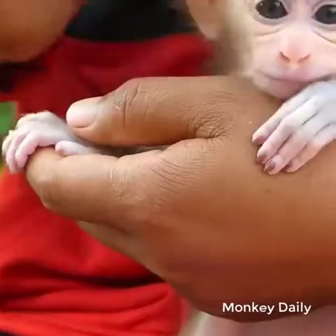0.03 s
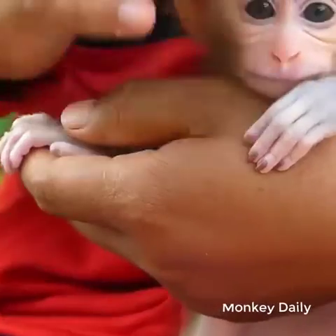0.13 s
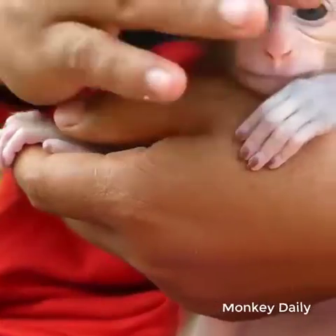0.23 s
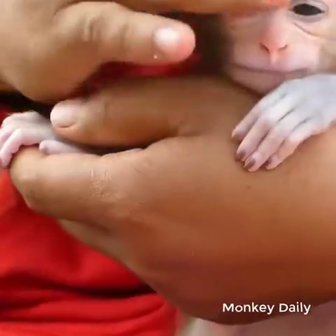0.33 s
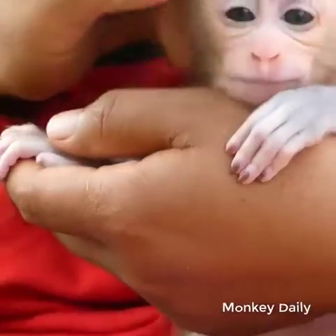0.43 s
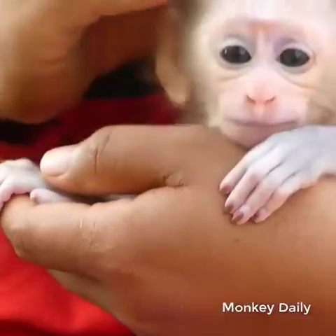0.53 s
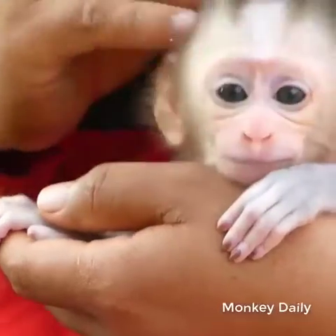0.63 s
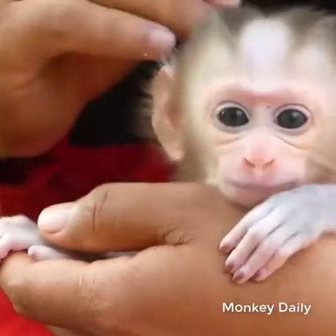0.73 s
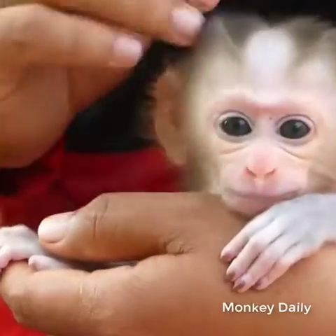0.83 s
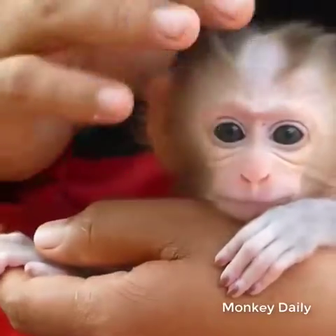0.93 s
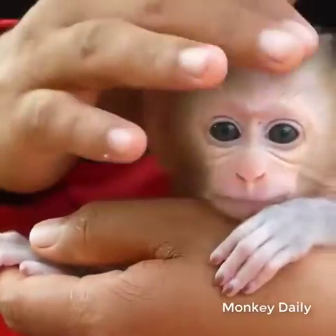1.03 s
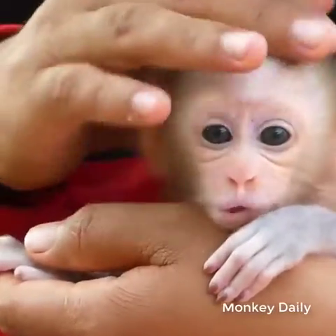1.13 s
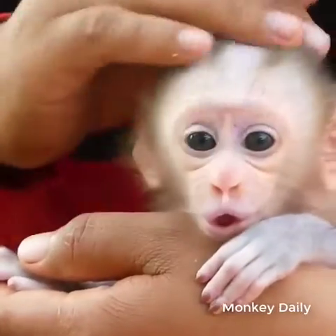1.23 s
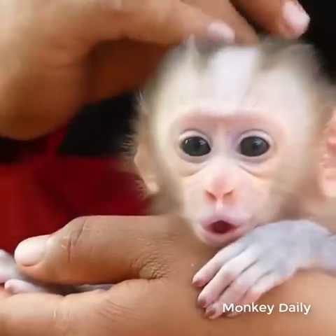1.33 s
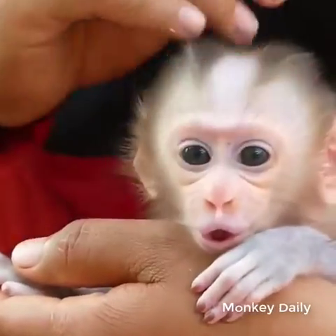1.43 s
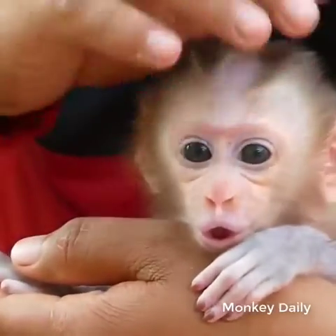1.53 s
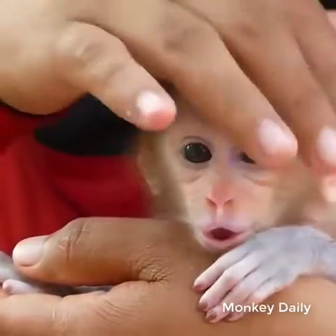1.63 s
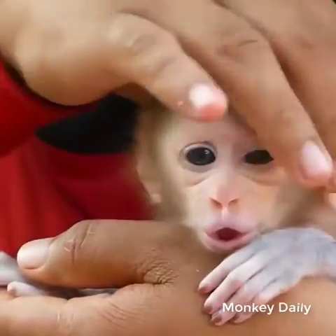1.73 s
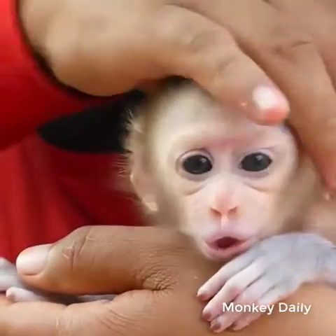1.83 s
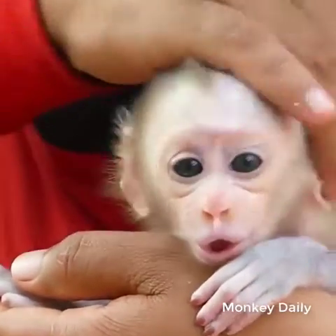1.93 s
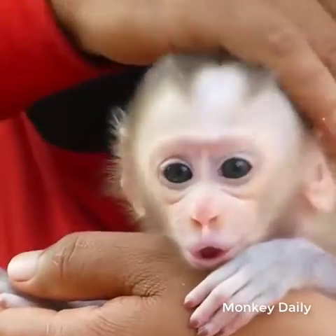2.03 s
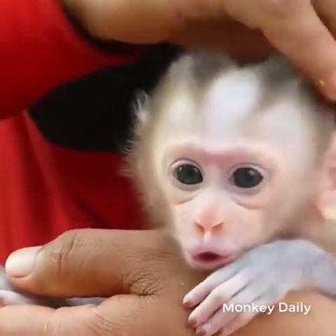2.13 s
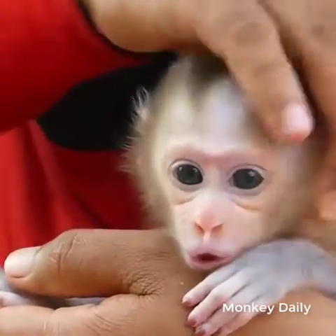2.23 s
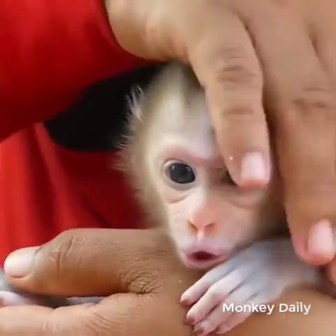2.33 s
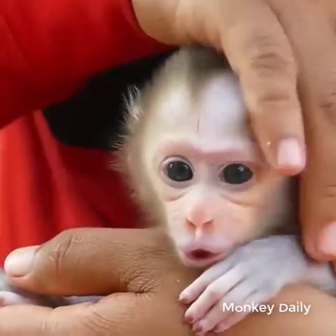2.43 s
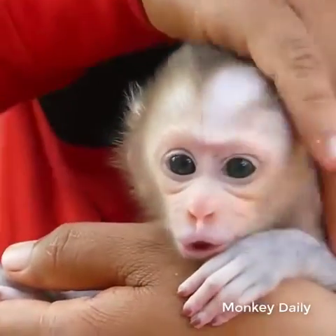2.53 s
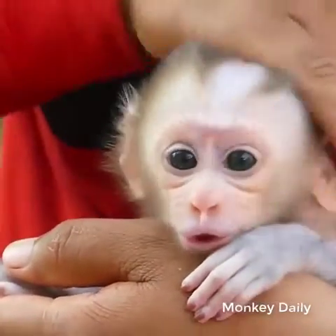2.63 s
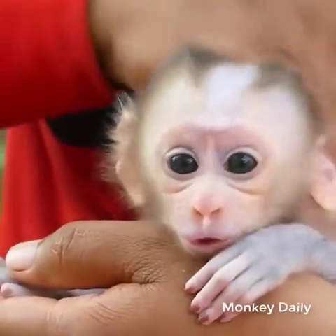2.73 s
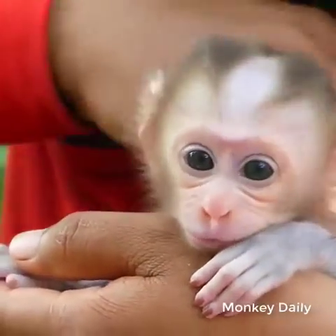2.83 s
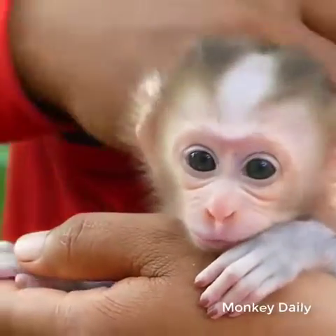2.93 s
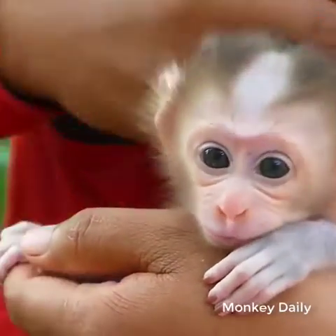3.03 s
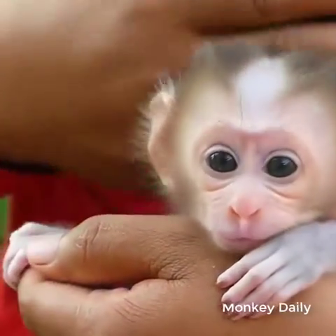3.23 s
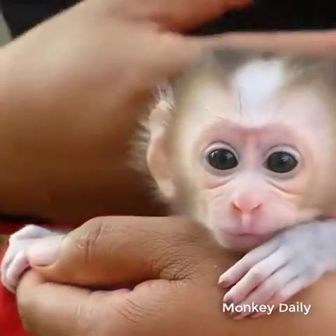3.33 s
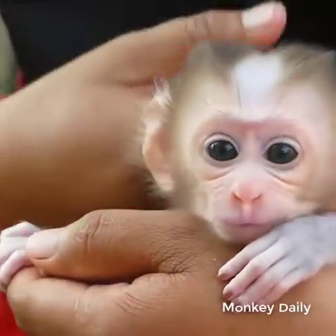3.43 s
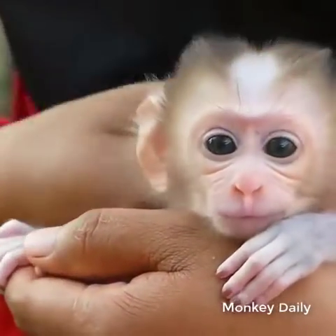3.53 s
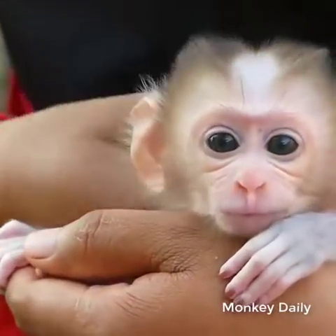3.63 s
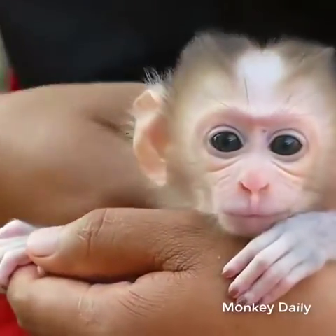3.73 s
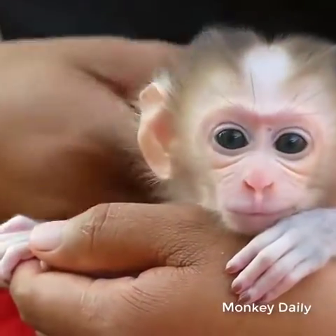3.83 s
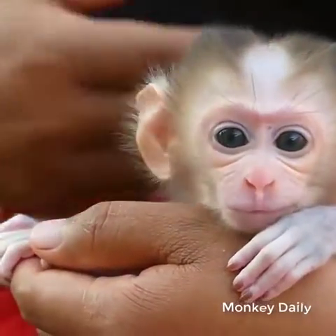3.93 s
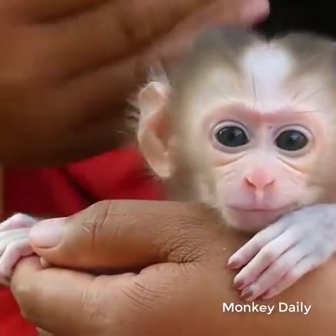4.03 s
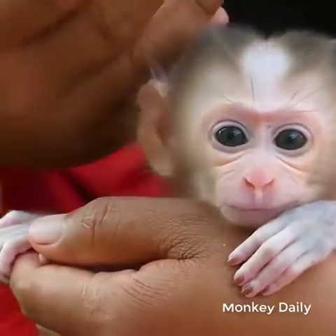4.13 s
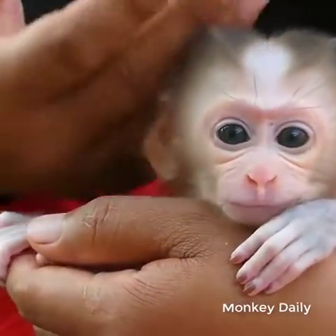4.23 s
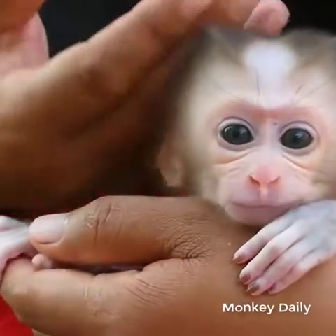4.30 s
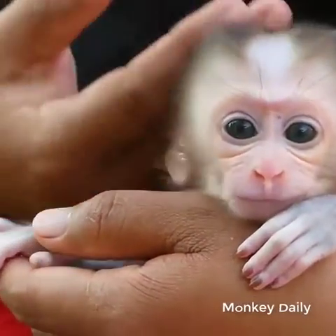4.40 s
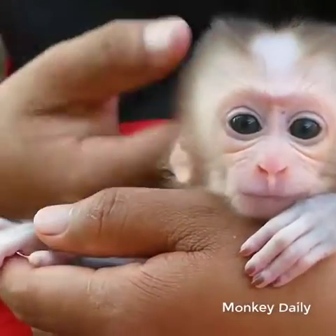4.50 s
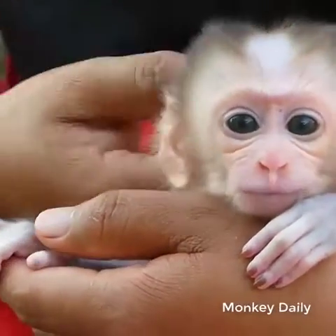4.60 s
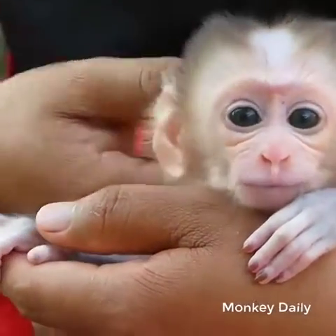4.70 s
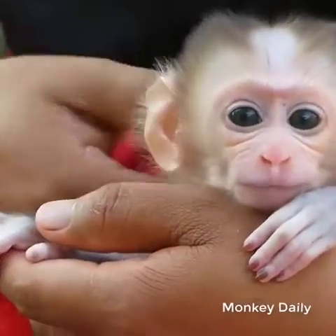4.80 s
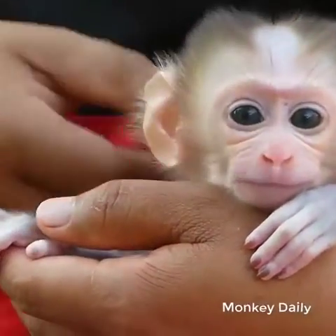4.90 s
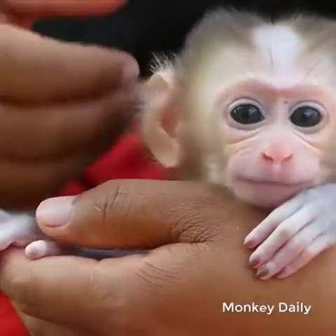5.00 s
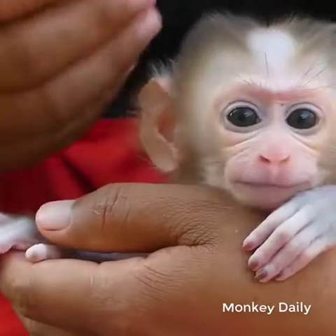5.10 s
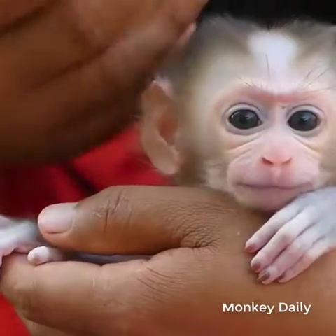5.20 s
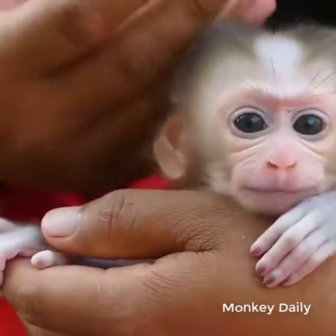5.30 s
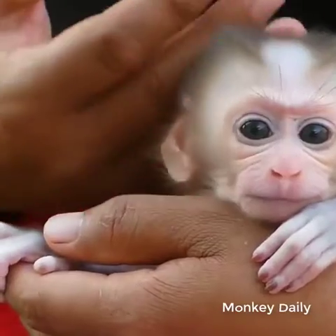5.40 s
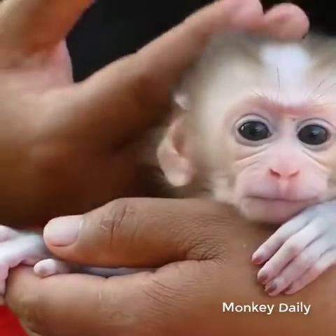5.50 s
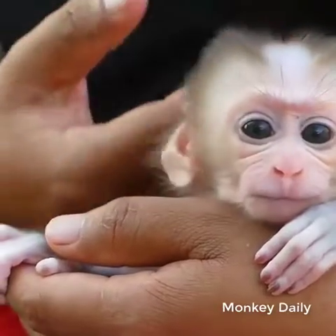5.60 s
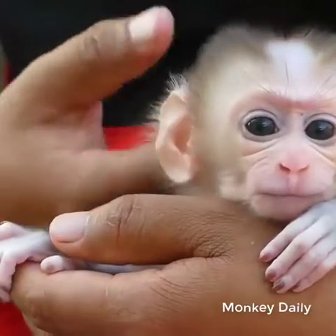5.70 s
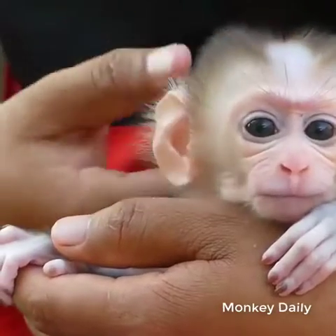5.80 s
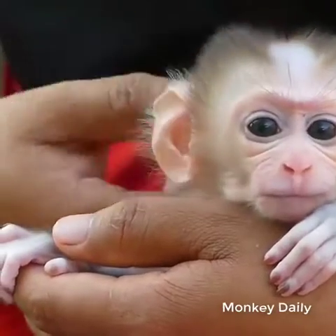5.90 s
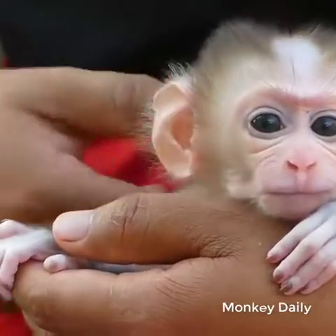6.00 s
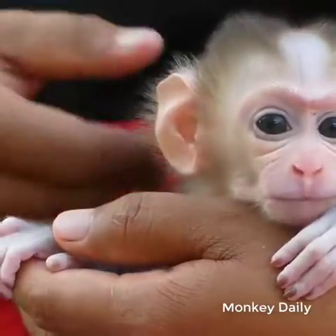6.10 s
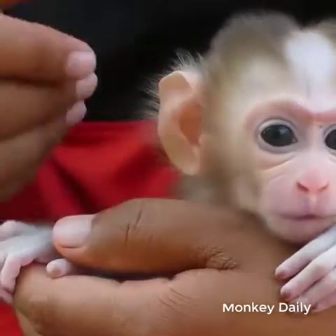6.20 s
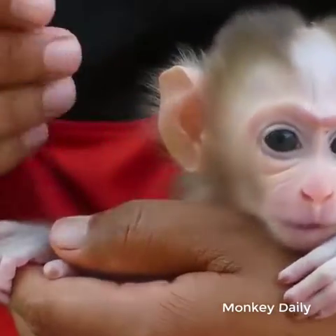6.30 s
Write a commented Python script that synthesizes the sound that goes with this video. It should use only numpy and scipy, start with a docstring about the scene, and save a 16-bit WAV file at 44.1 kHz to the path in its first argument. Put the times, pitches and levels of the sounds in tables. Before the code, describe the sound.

A quiet outdoor yard with reflecting walls: a faint low hum, airy outdoor noise and fine hiss run throughout, while small birds give short, sliding, two-voiced chirps from the start until about 5.8 s. Two very soft brushes of a hand on fur come around 0.6 and 0.9 s. At 1.2 s a baby monkey, close to the microphone, gives a loud, nearly pure coo that rises to a high peak and cracks into a brief rougher tail. Softer arched coos follow at 1.6, 2.0 and 2.4 s, with a tiny wet lip tick at 1.9; the hum swells slightly around 2.3. From 3.2 to 5.4 s faint, reverberant, wavering calls drift from afar. At 5.6, 5.9 and 6.15 s another animal, perhaps a rooster, cries hoarsely: a raspy burst, a clearer throbbing tone, then a longer rasping syllable opening with a squeal, all echoing off the walls.

```python
"""Outdoors, among reflecting walls and ground, a baby monkey close to the microphone gives four arched coos.
Each is a nearly pure gliding tone with overtones let out by the mouth; the voice cracks in the first.
Small birds chirp in two-voiced glides, faint calls drift from afar, and a hand brushes fur as soft noise.
A low hum, outdoor noise and hiss lie under everything. Near the end another animal, perhaps a rooster,
starts a hoarse call in three syllables, part shaky tone and part throat-ringing rasp."""
import sys
import numpy as np
from scipy import signal
from scipy.fft import rfft, irfft
from scipy.io import wavfile
from scipy.ndimage import uniform_filter1d, map_coordinates

SR = 44100
rng = np.random.default_rng(int(sys.argv[2]) if len(sys.argv) > 2 else 0)


def inscribe(sig):
    """Save sig as 16-bit PCM at rate SR to the path in sys.argv[1].

    A 1-D sig is mono; a 2-D sig holds one channel per row.
    Samples are clipped to [-1, 1] before scaling.
    """
    pcm = np.round(np.clip(np.atleast_2d(sig).T, -1, 1) * 32767)
    wavfile.write(sys.argv[1], SR, pcm.astype(np.int16))


N = 280035
TIME = np.arange(N) / SR

# air rushing through the glottis, also colouring the lip smack: (frequency [Hz], relative density [dB/Hz])
RASP_OUTLINE = [(600, -22.5), (1100, -6), (1700, -1.5), (3200, -5.5), (4500, -7.5), (7500, -11.5),
                (8600, -1), (9800, -15), (11000, -12), (15000, -27)]
# hoarse call: (start [s], length [s], attack [s], top pitch [Hz], level, 3 dB above that in the middle [dB],
# clear share in the middle [0-1], squeal length [s], squeal level [dB])
CALL_SYLLABLES = [(5.629, 0.14, 0.037, 763.7, -29.5, 0.1, 0.12, -39),
                  (5.9, 0.14, 0.027, 837, -25.5, 0.79, 0.0086, -35.5),
                  (6.149, 0.4045, 0.074, 795.4, -26.5, 0.23, 0.081, -28)]
REST_HZ = 769  # pitch at which the hoarse throat keeps its resting resonances


def undb(db):
    """Decibels to gain."""
    return 10 ** (np.asarray(db) / 20)


def unit(x):
    """Scale to rms 1."""
    return x / np.sqrt(np.mean(x ** 2))


def shape(hz, points):
    """Gain at hz of a (frequency [Hz], level [dB]) outline."""
    f, db = np.transpose(points)
    return undb(np.interp(np.log(hz + 1), np.log(f), db))


def noise(points):
    """Noise with the given spectral outline, rms 1."""
    spectrum = rfft(rng.standard_normal(N))
    return unit(irfft(spectrum * shape(np.fft.rfftfreq(N, 1 / SR), points), N))


def resonate(x, modes):
    """Pass x through steep parallel resonances (centre [Hz], width [Hz], gain [dB])."""
    f = np.fft.rfftfreq(N, 1 / SR) + 1  # kept off zero
    gain = sum(undb(db) / (1 + ((f * f - hz * hz) / (f * width)) ** 2) for hz, width, db in modes)
    return irfft(rfft(x) * gain, N)


def wobble(rate):
    """Smooth random drift with about `rate` turns a second, rms 1."""
    f = np.fft.rfftfreq(N, 1 / SR)
    return unit(irfft(rfft(rng.standard_normal(N)) * np.exp(-(f / rate) ** 2), N))


def swell(start, length):
    """A smooth rise and fall, 0 to 1 to 0."""
    return np.sin(np.pi * np.clip((TIME - start) / length, 0, 1))


def ramp(age, length):
    """A smooth step from 0 to 1."""
    return np.sin(np.pi / 2 * np.clip(age / length, 0, 1)) ** 2


def glides(table, warble):
    """Sliding tones that swell and fade; long ones warble more than short ones."""
    out = np.zeros(N)
    for start, length, from_hz, to_hz, db in table:
        on = (TIME > start) & (TIME < start + length)
        progress = (TIME[on] - start) / length
        hz = (from_hz + (to_hz - from_hz) * progress) * (1 + length * warble[on])
        phase = 2 * np.pi * np.cumsum(hz) / SR
        out[on] += undb(db) * np.sin(np.pi * progress) * np.sin(phase)
    return out


def yard(x, wet_db, delay_s, t60, width):
    """Direct sound plus scattered reflections from walls and ground; two channels."""
    t = TIME[:SR]
    tail = rng.standard_normal((2, SR)) * undb(-60 * t / t60) * (t > delay_s)
    tail /= np.sqrt(np.sum(tail ** 2, axis=1, keepdims=True))
    mid, side = (undb(wet_db) * signal.fftconvolve(x, h)[:N] for h in tail)
    return np.array([x + mid + width * side, x + mid - width * side])


def background():
    """Narrow bands of noise waver as a low hum under wavering outdoor noise and a hiss differing by side."""
    # noise common to both sides, and noise opposed between them: (frequency [Hz], relative density [dB/Hz])
    mid_outline = [(35, -47), (75, -11.5), (130, 3), (280, -4.5), (520, -5.5), (900, -10), (1700, -16.5),
                   (4500, -17.5), (7100, -18), (7800, -24.5), (9000, -20.5), (10000, -19.5), (10700, -14.5),
                   (15000, -20.5)]
    side_outline = [(30, -39.5), (70, -32.5), (130, -2), (300, 3.5), (550, 2), (1000, -3), (2000, -8),
                    (5000, -25), (7000, -47), (8500, -13.5), (11000, -18.5), (15000, -34.5)]
    # low hum: (centre [Hz], width [Hz], level before the common trim [dB])
    hum_bands = [(109.1, 14, -70), (147.8, 22, -68), (196.6, 8, -75)]
    trim_db, swell_db = -2.5, 7
    hum = np.zeros(N)
    for hz, width, db in hum_bands:
        hum += undb(db) * unit(resonate(rng.standard_normal(N), [(hz, width, 0)]))
    hum *= undb(trim_db + swell_db * swell(1.54, length=1.5))  # the hum swells once
    mid = undb(-56.5) * noise(mid_outline) * undb(2.3 * wobble(1.6))
    side = undb(-59) * noise(side_outline)
    return hum + mid + np.array([side, -side])


def far_calls():
    """Wavering gliding tones from a distance, with strong reverberation."""
    # faint calls: (start [s], length [s], start pitch [Hz], end pitch [Hz], level [dB])
    calls = [(3.23, 0.25, 784.3, 796, -62.5), (3.47, 0.15, 966, 994, -59.5), (3.6, 0.76, 771, 627.5, -63),
             (4.27, 0.24, 1228, 1109, -63), (4.52, 0.27, 985, 763.4, -61.5), (4.9, 0.21, 1001, 1029, -59.5),
             (5.15, 0.21, 500, 495.5, -60)]
    return yard(glides(calls, 0.166 * wobble(60)), wet_db=-3, delay_s=0.0143, t60=0.96, width=0.4)


def birds():
    """The two sides of the syrinx sing warbling glides together, heard with strong reflections."""
    # chirps, lower voice: (middle [s], pitch [Hz], glide [octaves], level [dB])
    chirps = [(0.026, 4060, -0.46, -55), (.225, 3905, -0.94, -56.5), (0.897, 3725, -0.74, -57),
              (1.05, 4070, .5, -55.5), (1.217, 3704, -0.39, -53), (1.86, 3520, -0.37, -52),
              (2.255, 3620, -1, -50), (2.448, 4200, -.4, -51.5), (2.558, 4180, -0.45, -57.5),
              (2.871, 3730, -0.86, -49), (3.128, 3000, 0.74, -52.5), (3.31, 3350, 0.46, -62.5),
              (3.525, 3440, 0.81, -52.5), (3.724, 3450, 0.74, -56), (4.489, 3930, -.5, -52),
              (4.86, 2998, -0.79, -52), (5.078, 3460, -0.61, -50), (5.189, 3973, -.4, -58.5),
              (5.833, 3900, -.4, -49.5)]
    chirp_s = .074
    interval = 1.3  # pitch ratio of the upper voice to the lower
    lower, upper = [], []
    for middle, hz, glide, db in chirps:
        start = middle - chirp_s / 2
        from_hz, to_hz = hz / 2 ** (glide / 2), hz * 2 ** (glide / 2)
        lower.append((start, chirp_s, from_hz, to_hz, db))
        upper.append((start, chirp_s, from_hz * interval, to_hz * interval, db - 3))
    song = glides(lower, 1.27 * wobble(150.4)) + glides(upper, 1.6 * wobble(150))
    return yard(song, wet_db=-0.5, delay_s=0.0047, t60=0.49, width=.07)


def hand():
    """Skin brushes over fur: soft noise that follows the stroking pressure and flickers unevenly."""
    # strokes: (start [s], length [s], level [dB])
    strokes = [(0.63, 0.17, -54.5), (0.93, 0.22, -53.5)]
    # colour of the brushing: (frequency [Hz], relative density [dB/Hz])
    fur_outline = [(100, -0.5), (300, -2.5), (900, -4.5), (3000, -8.5), (6000, -15.5), (12000, -20)]
    pressure = sum(undb(db) * swell(start, length) for start, length, db in strokes)
    return pressure * noise(fur_outline) * undb(0.99 * wobble(60))


def syllables():
    """Gain, pitch and clear share of the hoarse call: each syllable's arch peaks in its middle."""
    swell_db, release_s = 6, 0.0096
    arch_share = .08  # how much lower the pitch is at both ends
    gain, hz, clear = np.zeros(N), np.full(N, 1. * REST_HZ), np.zeros(N)
    for start, length, attack, top_hz, db, clear_share, _, _ in CALL_SYLLABLES:
        on = (TIME > start) & (TIME < start + length)
        age, arch = TIME[on] - start, swell(start, length)[on]
        level = undb(db - swell_db * (1.5 - arch))
        gain[on] = ramp(age, attack) * ramp(length - age, release_s) * level
        hz[on] = top_hz * (1 - arch_share * (1 - arch))
        clear[on] = clear_share * arch
    return gain, hz, np.clip(clear, 0, 1)


def hoarse_call():
    """A voice swings between a shaky tone and a period-doubled, chaotic rasp ringing the throat."""
    # resonances of the hoarse throat: (centre [Hz], width [Hz], relative gain [dB])
    throat_modes = [(505, 140, -39), (737, 424, -9), (1142, 146, -4), (1540, 230, 5.5), (1976, 98, -2),
                    (2940, 217, -1), (4116, 57, -12.5), (5010, 84, -8.5), (6260, 580, -17.5),
                    (7160, 710, -26.5), (8750, 1650, -26.5), (10560, 250, -24.5), (12900, 330, -25),
                    (14300, 1500, -29)]
    # harmonics of the clear tone: (harmonic number, relative level [dB])
    tone_harmonics = [(1, 1.5), (2, 9), (3, -39.5), (4, -6), (5, -39), (6, -15)]
    throat_follows = .55  # exponent by which the resonances follow the pitch
    gain, hz, clear = syllables()
    phase = 2 * np.pi * np.cumsum(hz * (1 + 0.016 * wobble(231.6))) / SR
    tone = unit(sum(undb(db) * np.sin(k * phase) for k, (_, db) in enumerate(tone_harmonics, 1)))
    # the tone comes in quick uneven throbs, about 31 a second
    throb = np.sin(2 * np.pi * np.cumsum(31 * (1 + 0.208 * wobble(19.5))) / SR)
    tone *= unit(undb(5.2 * throb + 2.1 * wobble(60)))
    # in the rasp the folds slap shut only on every other swing, and at uneven moments
    slap_phase = np.pi * np.cumsum(REST_HZ * (1 + .07 * wobble(240.9))) / SR
    slaps = unit(sum(np.sin(k * slap_phase) for k in np.arange(1, 31)))
    air = undb(1.5) * rng.standard_normal(N) * (1 + np.cos(2 * slap_phase))
    rasp = unit(resonate((slaps + air) * undb(1.35 * wobble(180)), throat_modes))
    # the throat tightens as the pitch rises: reading the rasp faster lifts its slaps and resonances
    read_at = np.cumsum((hz / REST_HZ) ** throat_follows)
    rasp = map_coordinates(rasp, [read_at], mode="mirror")
    voice = gain * (np.sqrt(clear) * tone + np.sqrt(1 - clear) * rasp)
    # a squeal, falling from 2050 to 1937 Hz, opens each syllable
    squeals = [(start, length, 2050, 1937, db) for start, *_, length, db in CALL_SYLLABLES]
    voice += glides(squeals, 0.36 * wobble(260)) * undb(1.5 * wobble(170))
    return yard(voice, wet_db=-1.0, delay_s=.006, t60=0.52, width=0.11)


def lip_smack():
    """A tiny wet tick, a fast-dying noise burst, as the monkey's lips part between two coos."""
    age = TIME - 1.902
    burst = (age > 0) * np.exp(-np.abs(age) / 0.0009)
    return undb(-37.5) * burst * noise(RASP_OUTLINE)


def coo_pitch(age, rise, fall, from_hz, top_hz, climb, sag):
    """A quick scoop, a steady climb to the top, a sag and a last drop as the voice lets go."""
    scoop_s, drop_hz, drop_s = .021, 89.8, .01
    line = top_hz - climb * np.maximum(rise - age, 0) - sag * np.maximum(age - rise, 0)
    scoop = (from_hz - line) * np.exp(-(age / scoop_s) ** 2)
    return line + scoop - drop_hz * np.exp((age - rise - fall) / drop_s)


def monkey():
    """Nearly pure coos swell with pitch; the mouth lets overtones out, and in a crack the folds beat unevenly."""
    # coos, the second row being what follows the crack: (start [s], rise [s], fall [s], attack [s],
    # release [s], start pitch [Hz], top pitch [Hz], climb [Hz/s], sag [Hz/s], level at the top pitch [dB],
    # loss below the top [dB/Hz], second harmonic [dB], upper harmonics [dB], breath [dB],
    # time to open the mouth [s], roughness before squaring [0-1])
    coos = [(1.222, .143, .038, .026, .006, 850, 1205, 1600, 700, -10.2, .07, -41, -28, -45, .07, .25),
            (1.397, .037, .038, .008, .011, 990, 1085, 3600, 2900, -23.8, .035, -37, -29, -44, .01, .58),
            (1.617, .113, .06, .02, .052, 850, 1113, 480, 1400, -16.4, .028, -38, -27, -53, .04, .25),
            (1.978, .106, .065, .034, .032, 790, 1076, 1700, 600, -21, .015, -37, -30, -56, .09, .25),
            (2.359, .121, .058, .041, .026, 795, 1012, 1080, 750, -21, .005, -38, -39, -60, .12, .05)]
    # third harmonic, one curve for each coo: (time [s], level [dB])
    third_curves = [
        [(1.24, -54), (1.26, -41), (1.31, -19.5), (1.356, -32), (1.398, -35.5)],
        [(1.4, -46), (1.408, -30), (1.458, -45.5), (1.47, -50)],
        [(1.63, -49), (1.66, -29), (1.716, -35), (1.732, -48), (1.758, -27), (1.78, -28)],
        [(2.02, -53), (2.032, -54), (2.052, -30.5), (2.112, -23), (2.14, -37.5)],
        [(2.41, -63.5), (2.46, -45.5), (2.508, -46), (2.535, -63.5)],
    ]
    # throat and mouth, for the fourth harmonic and above: (frequency [Hz], relative gain [dB])
    throat_outline = [(2500, -10.5), (3000, 33), (3550, -2.5), (4000, -21), (4400, -16.5), (4800, -24),
                      (5200, -39.5), (5900, -30.5), (6600, -31), (7900, -41.5), (8600, -28), (9900, -28.5),
                      (10800, -21.5), (12500, -40), (15000, -45.5)]
    # second tone in the crack: (start [s], length [s], start pitch [Hz], end pitch [Hz], level [dB])
    crack_tone = [(1.384, 0.03, 1343, 1321, -31)]
    # narrow treble resonances that the voice rings: (centre [Hz], width [Hz], gain [dB])
    treble_modes = [(8720, 280, 17), (9480, 70, 7.5)]
    closed_db = -12.5  # mouth gain while the lips are still closed
    press_share = 0.67  # how far the treble follows the level of the third harmonic
    mouth_hz, mouth_width_hz = 2110, 380  # the resonance that the second harmonic sweeps through
    falter_s, falter_db = 0.0084, -9.5  # the fundamental falters as the voice cracks

    jitter, shimmer, flutter, treble_flicker = wobble(260), wobble(90), wobble(260), wobble(119.7)
    rasp, snap_jitter, overtone_flicker = noise(RASP_OUTLINE), wobble(498.9), wobble(80)
    out = glides(crack_tone, 0.49 * wobble(200))
    falter = falter_db * swell(crack_tone[0][0], falter_s) ** 2
    for coo, third_curve in zip(coos, third_curves):
        start, rise, fall, attack, release, from_hz, top_hz, climb, sag = coo[:9]
        top_db, db_per_hz, second_db, upper_db, breath_db, opening_s, roughness = coo[9:]
        on = (TIME > start) & (TIME < start + rise + fall)
        age = TIME[on] - start
        gate = ramp(age, attack) * ramp(rise + fall - age, release)
        hz = coo_pitch(age, rise, fall, from_hz, top_hz, climb, sag)
        db = top_db - db_per_hz * (top_hz - hz) + falter[on]
        mouth = undb(closed_db * (1 - ramp(age, opening_s)))
        third_db = np.interp(TIME[on], *np.transpose(third_curve))
        press = undb(press_share * (third_db - third_db.max()))
        # the folds settle as the coo goes on
        rough = np.clip(roughness, 0, 1) ** 2 * (1 - ramp(age, rise + fall))
        phase = 2 * np.pi * np.cumsum(hz * (1 + (0.0039 + 0.044 * rough) * jitter[on])) / SR
        second = mouth * undb(second_db) / (1 + (2 * (2 * hz - mouth_hz) / mouth_width_hz) ** 2)
        overtones = second * np.sin(2 * phase) + undb(third_db) * np.sin(3 * phase)
        overtones *= undb(1.2 * overtone_flicker[on])
        # the highest harmonics come from the snap of the closing folds; an uneven snap blurs them
        snap = np.sqrt(mouth * press) * undb(upper_db + 2.6 * treble_flicker[on])
        snap_phase = phase + (0.03973 + .3 * rough) * snap_jitter[on]
        for k in np.arange(4, 15):
            overtones += snap * shape(k * hz, throat_outline) * np.sin(k * snap_phase)
        voice = np.sqrt(2) * gate * (undb(db) * np.sin(phase) + overtones)
        voice *= 1 + 0.025 * shimmer[on] + .35 * rough * flutter[on]
        # air escapes once a cycle
        breath = undb(breath_db + 1.3 * treble_flicker[on]) * rasp[on]
        air = np.sqrt(gate) * press * breath * (1 + np.cos(phase))
        out[on] += voice + air
    ring = resonate(out, treble_modes)
    # a nearby wall returns one faint, dull echo
    dull = uniform_filter1d(out, size=6)
    out += undb(-22.5) * np.interp(TIME - .032, TIME, dull, left=0)
    # the treble ring reaches the right side one sample late
    ring_sides = np.array([ring, np.roll(ring, 1)])
    return yard(out, wet_db=-25.5, delay_s=.012, t60=0.33, width=.8) + ring_sides


def scene():
    """All sources at the microphone."""
    return background() + far_calls() + birds() + hand() + hoarse_call() + lip_smack() + monkey()


def record(dry):
    """The microphone drops the deepest bass and leans slightly left; the top is cut off at 15750 Hz."""
    bass_cut = signal.butter(2, 60, "high", fs=SR, output="sos")
    top_cut = signal.ellip(10, .1, 80, 15750, fs=SR, output="sos")
    x = signal.sosfilt(bass_cut, dry) * undb(np.array([[.12], [-.12]]))
    return signal.sosfilt(top_cut, x)


dry = scene()
out = record(dry)
inscribe(out)
```